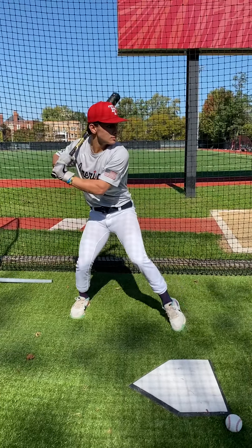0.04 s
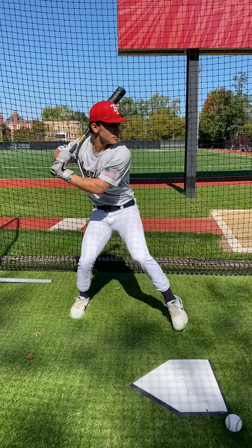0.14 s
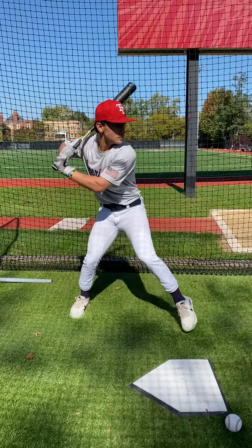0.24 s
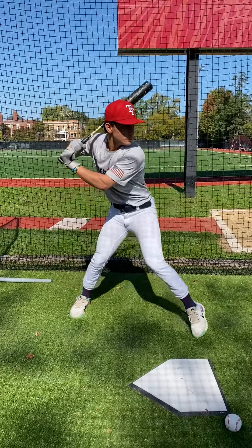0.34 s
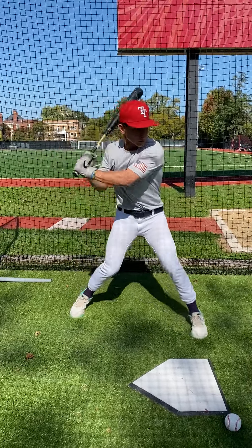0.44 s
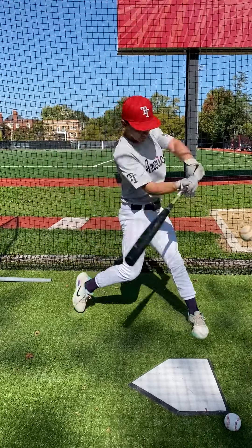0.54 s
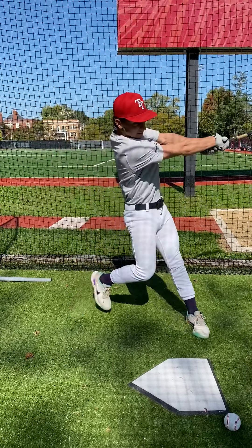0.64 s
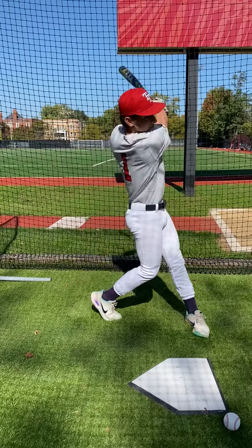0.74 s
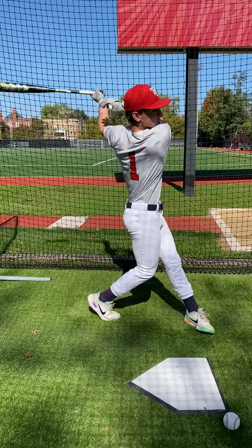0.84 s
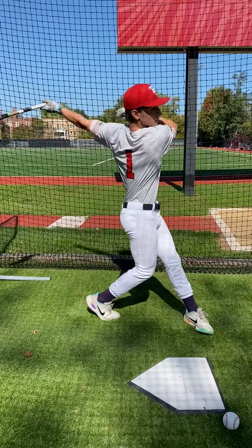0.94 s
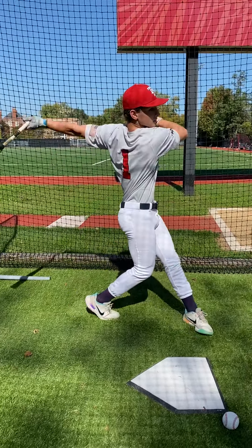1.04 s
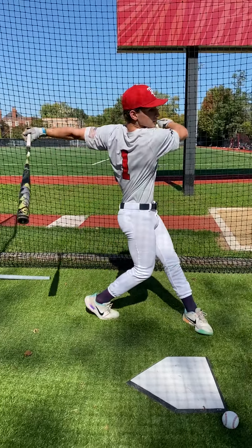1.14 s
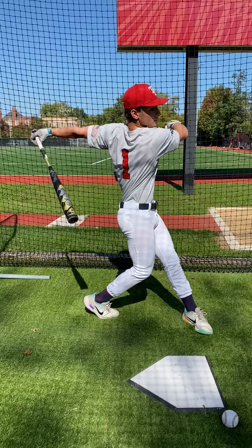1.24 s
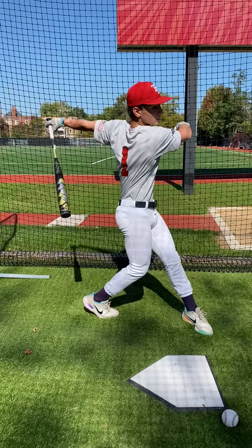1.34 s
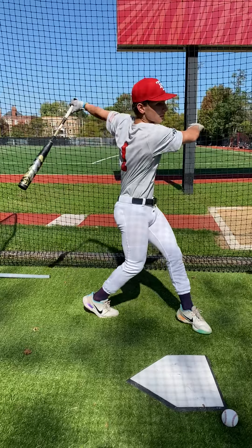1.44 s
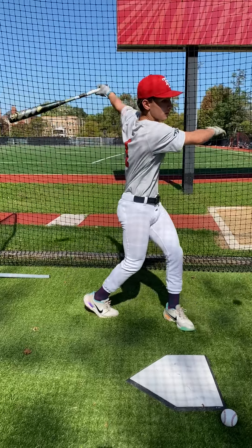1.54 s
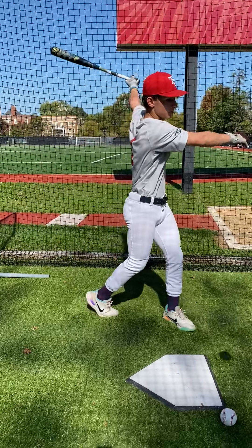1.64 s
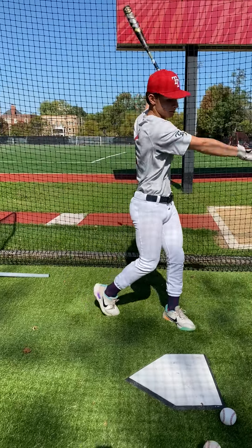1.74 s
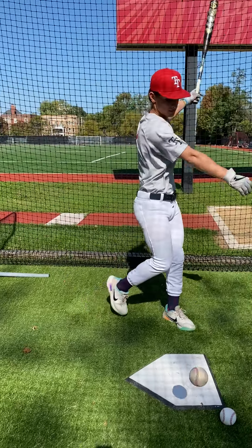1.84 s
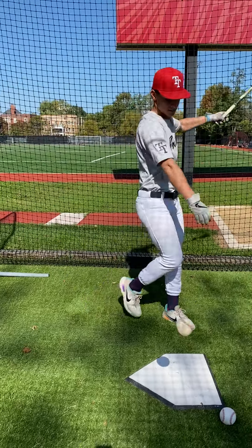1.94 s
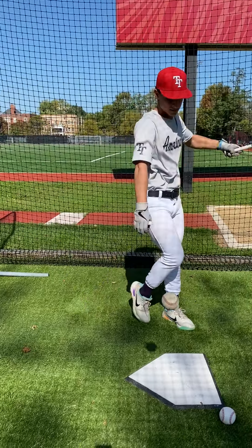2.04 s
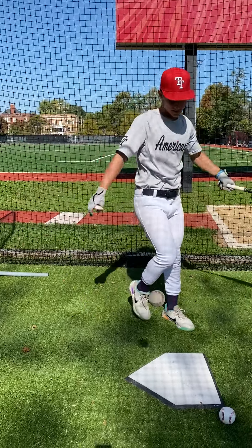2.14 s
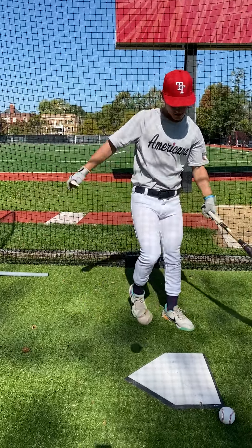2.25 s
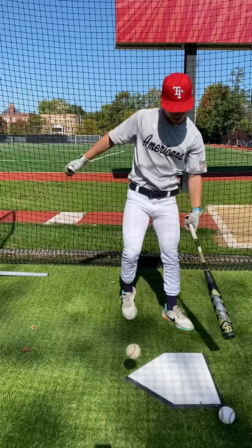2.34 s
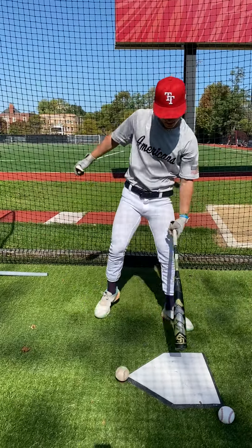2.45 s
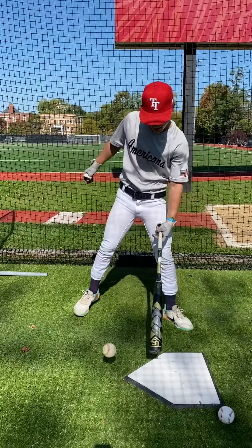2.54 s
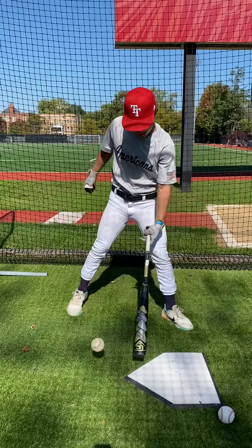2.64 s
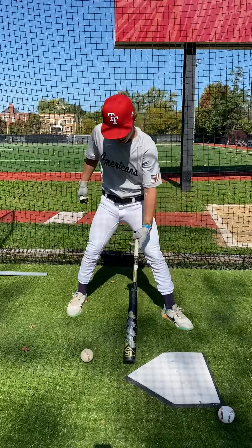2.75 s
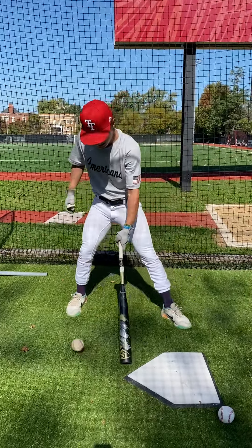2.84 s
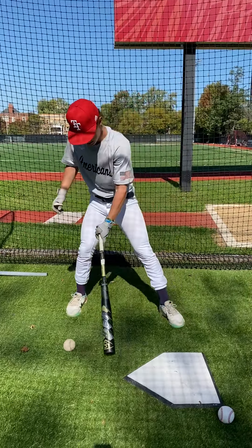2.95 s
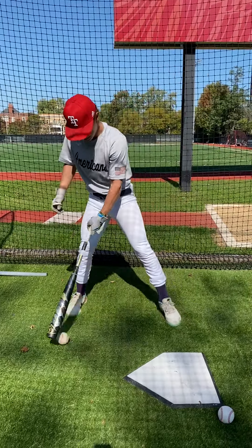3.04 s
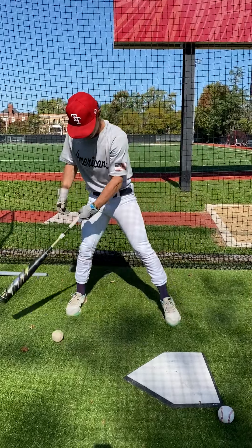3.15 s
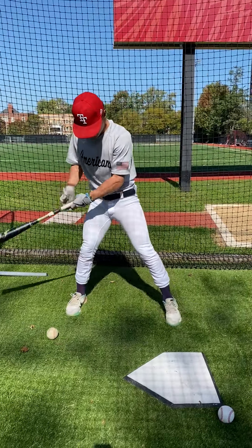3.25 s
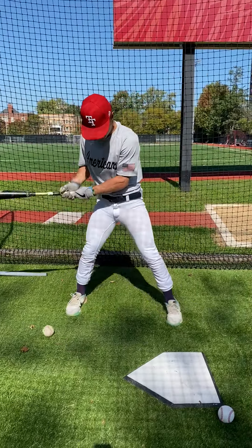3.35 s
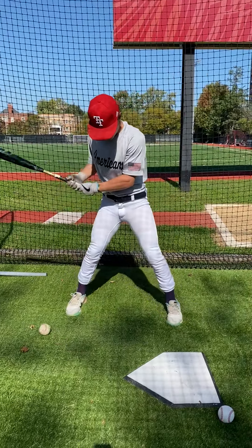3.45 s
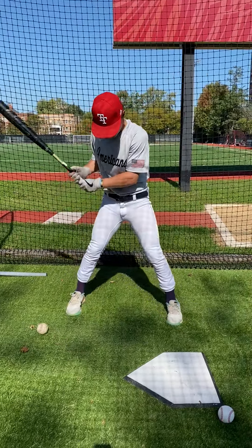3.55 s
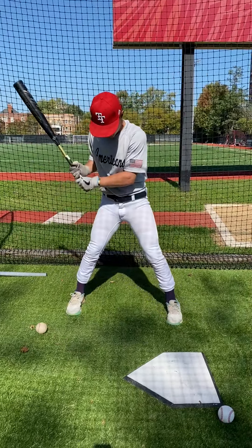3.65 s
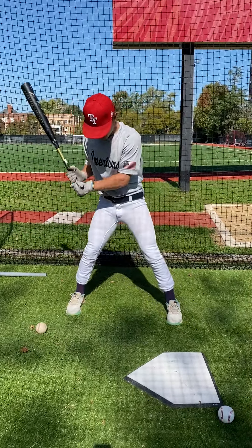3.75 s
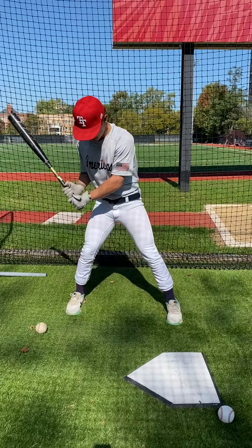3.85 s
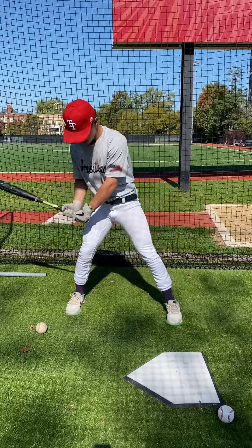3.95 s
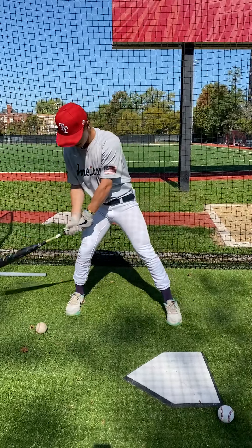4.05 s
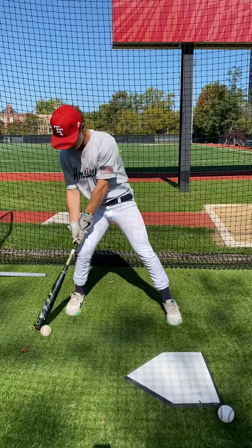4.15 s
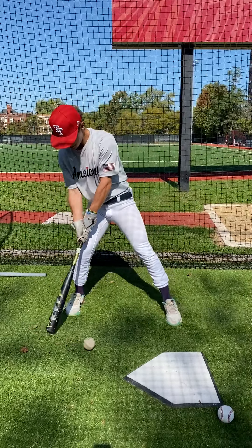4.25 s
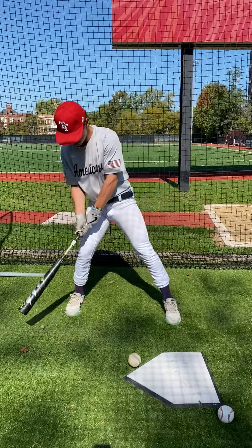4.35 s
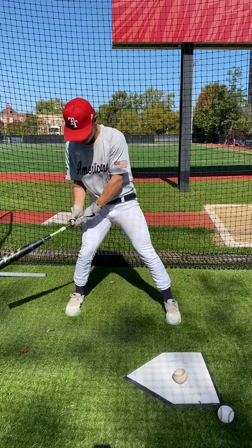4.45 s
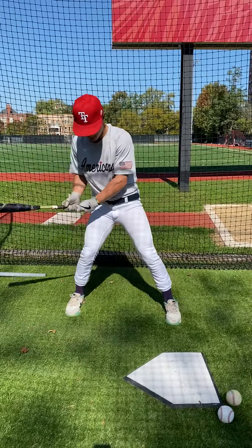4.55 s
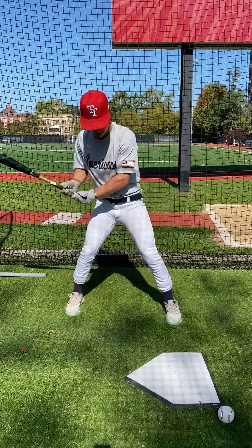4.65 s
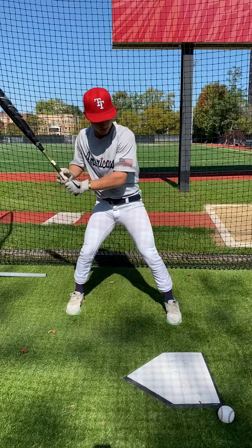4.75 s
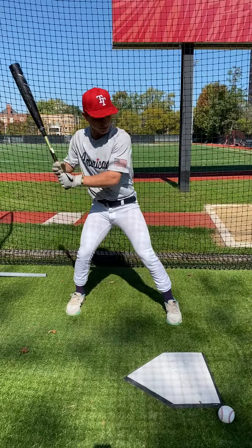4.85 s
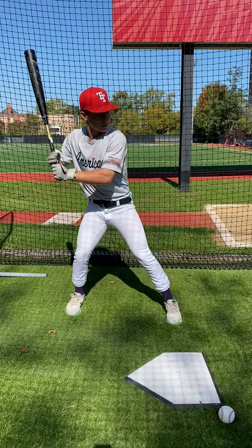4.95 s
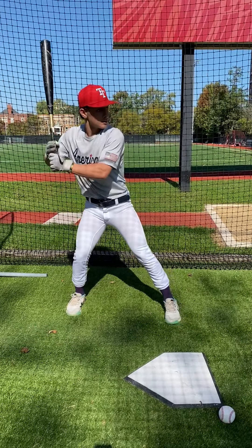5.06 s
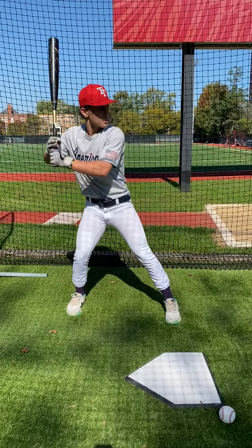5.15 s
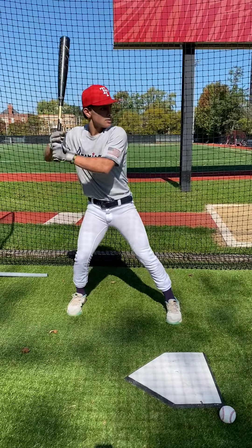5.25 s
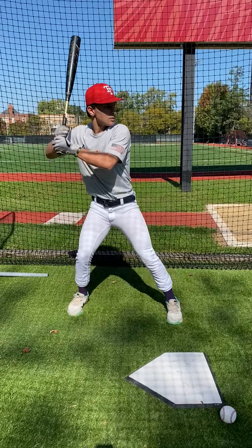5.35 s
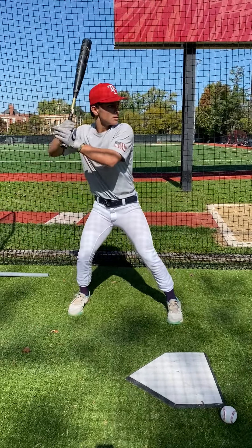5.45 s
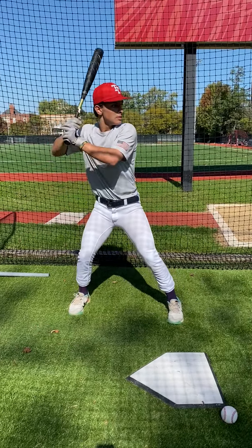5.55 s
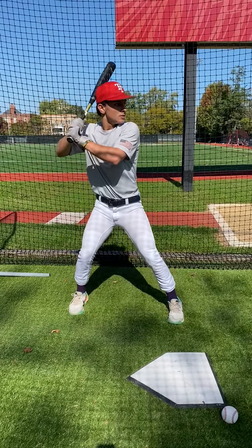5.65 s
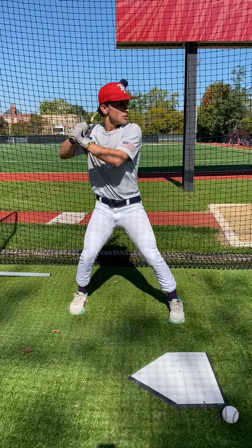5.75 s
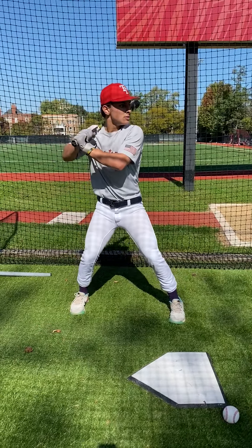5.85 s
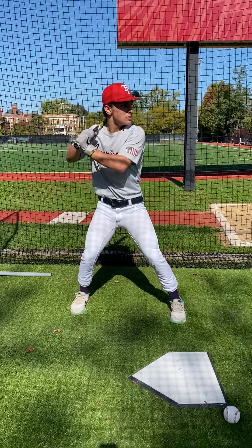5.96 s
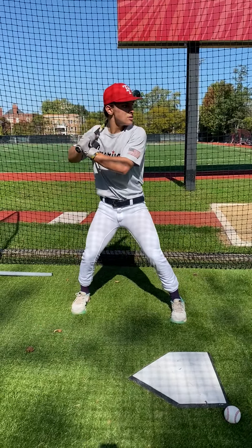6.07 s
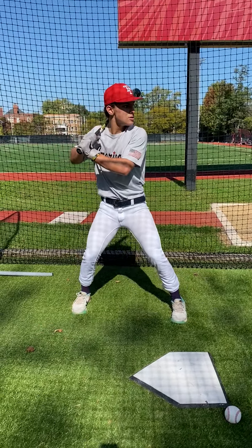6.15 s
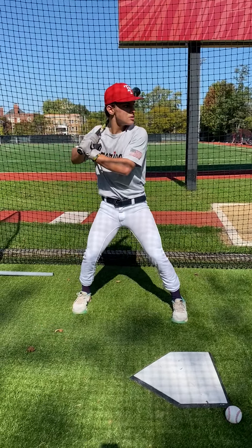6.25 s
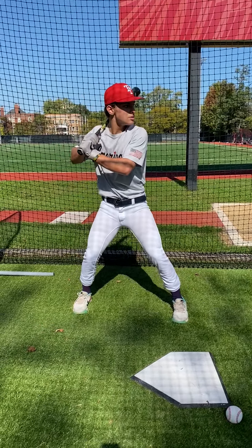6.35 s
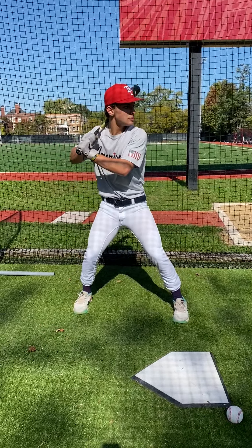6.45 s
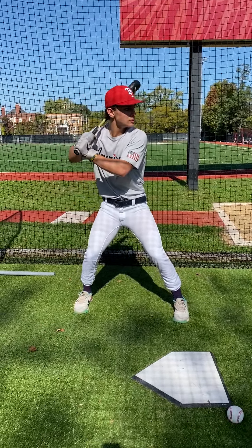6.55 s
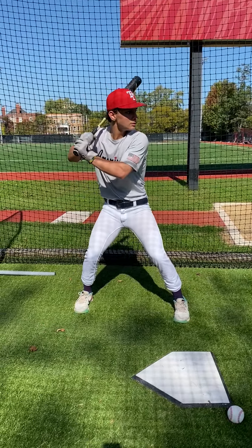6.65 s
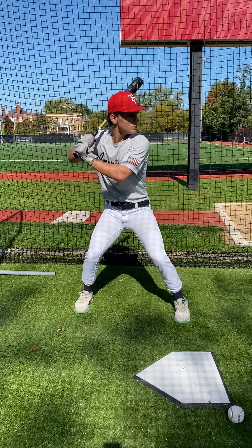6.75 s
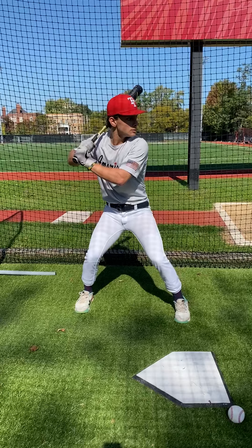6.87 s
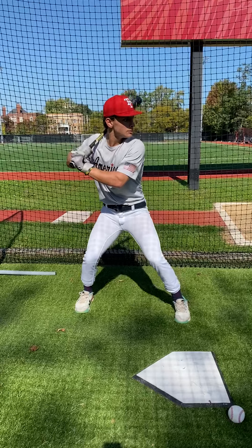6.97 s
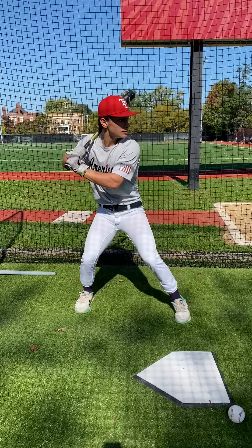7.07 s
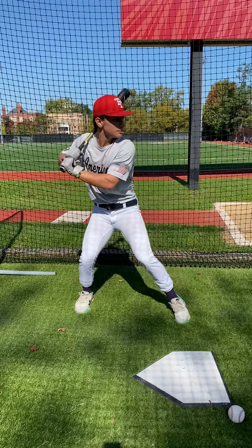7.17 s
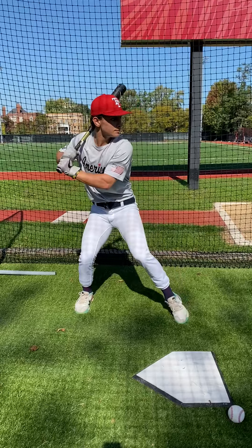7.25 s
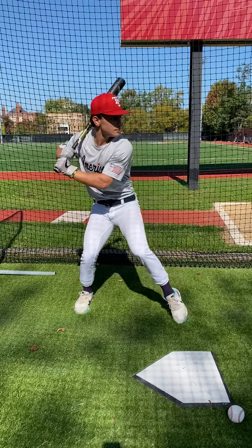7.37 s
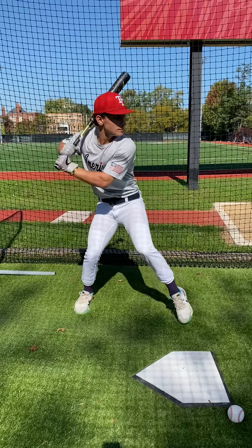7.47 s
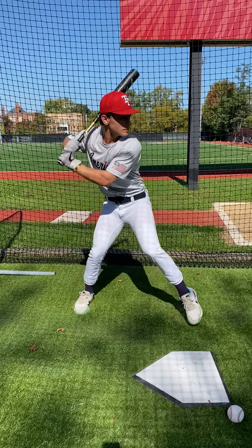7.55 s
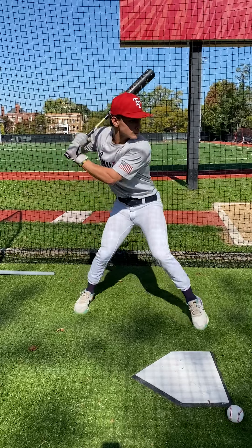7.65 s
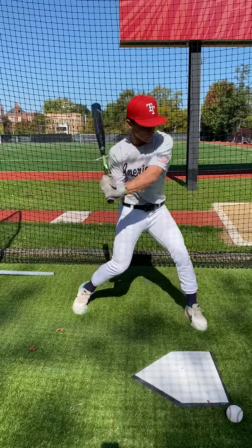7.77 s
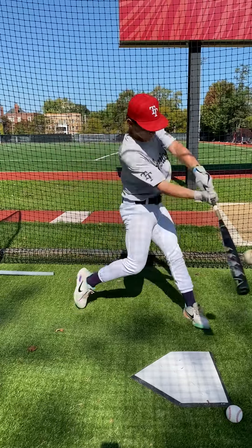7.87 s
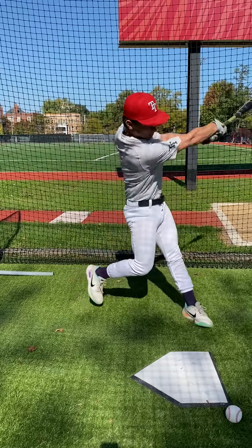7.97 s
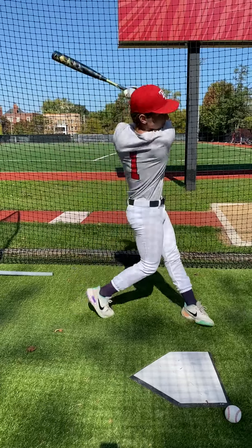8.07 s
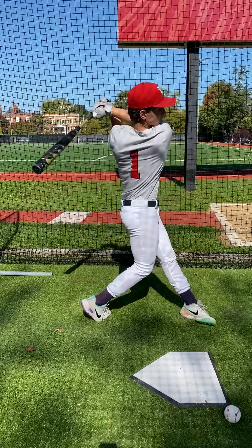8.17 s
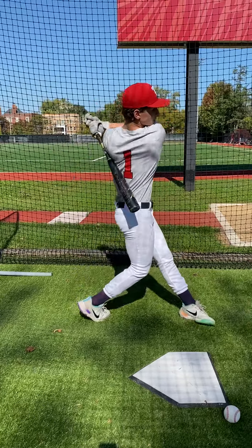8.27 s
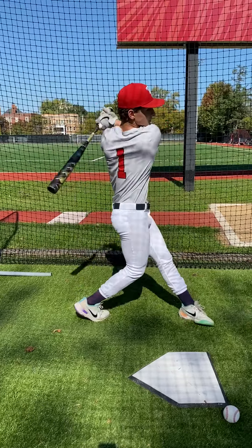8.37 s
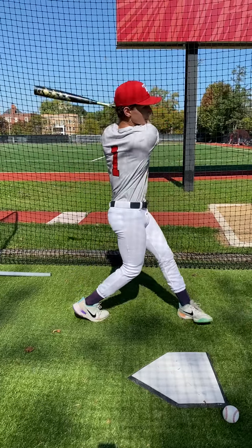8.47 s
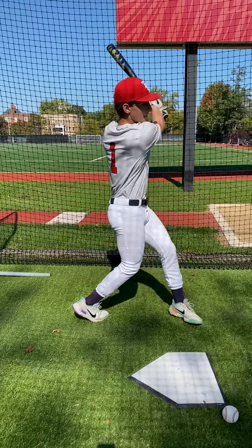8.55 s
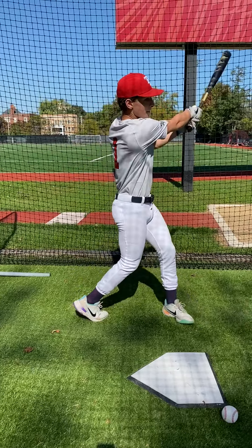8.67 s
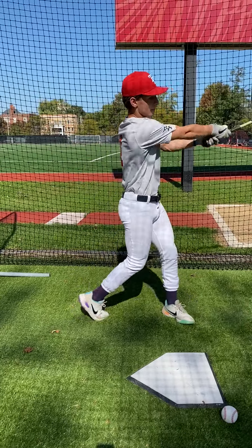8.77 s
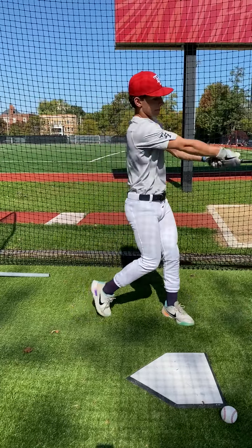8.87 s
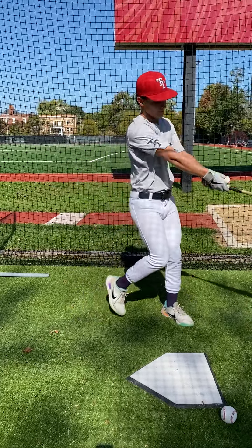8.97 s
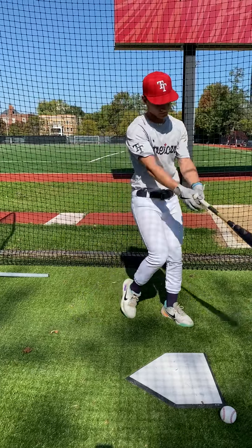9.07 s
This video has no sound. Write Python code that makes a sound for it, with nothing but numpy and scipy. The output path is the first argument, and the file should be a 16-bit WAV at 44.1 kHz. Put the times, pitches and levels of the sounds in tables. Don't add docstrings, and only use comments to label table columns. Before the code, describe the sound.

Outdoor batting cage: two sharp, ringing bat hits several seconds apart, with net rattle, far echo, turf thuds and low town hum.

```python
import sys
import numpy as np
from scipy import signal
from scipy.io import wavfile
from scipy.ndimage import uniform_filter1d

SR = 44100
rng = np.random.default_rng(int(sys.argv[2]) if len(sys.argv) > 2 else 0)


def log_audio(samples):
    frames = np.atleast_2d(samples).T
    limited = np.clip(frames, -1, 1)
    pcm = np.round(limited * 32767).astype(np.int16)
    wavfile.write(sys.argv[1], SR, pcm)


def magnitude_from_level(level_db):
    exponent = np.asarray(level_db, float) / 20
    return 10 ** exponent


N = 401751

# (time [s], crack level [dB], barrel level [dB], barrel pitch [Hz], air push level [dB])
BAT_HITS = [
    (0.6322, -11.5, -12.5, 3090, -16),
    (7.9388, -11.5, -15.5, 3043, -7.5),
]
# (time [s], level [dB])
TOWN_SWELLS = [(0.0, -35.5), (0.3, -37), (0.6, -38), (1.15, -43), (1.55, -40.5), (2.3, -41.5),
               (3.35, -42.5), (3.9, -41.5), (4.6, -41.5), (5.25, -41), (5.7, -40.5), (6.06, -37),
               (6.44, -37.5), (7.1, -37), (7.36, -37), (7.66, -36.5), (8.3, -37), (9.11, -38)]
# (frequency [Hz], gain [dB])
NEAR_COLOUR = [(20, -8), (40, 13.5), (7000, -4), (8500, -12.5), (10500, -21), (11500, -5), (15700, 2.5)]


def read(points, hz):
    f, value = np.transpose(points)
    return np.interp(np.log(hz + 1), np.log(f + 1), value)


def evened(x):
    return x / np.sqrt(np.mean(x ** 2) + 1e-20)


def wander(x, width):
    return evened(uniform_filter1d(uniform_filter1d(x, width), width))


def add(mix, s, sound):
    part = mix[:, round(s * SR):][:, :sound.shape[1]]
    part += sound[:, :part.shape[1]]


def colour(x, points):
    level_db = read(points, abs(np.fft.fftfreq(4096, 1 / SR)))
    log = np.log(magnitude_from_level(np.maximum(level_db, -90)))
    taps = np.fft.ifft(np.exp(log - 1j * signal.hilbert(log).imag)).real[:2048]
    return signal.oaconvolve(x, taps / np.linalg.norm(taps))[:len(x)]


def resonate(x, hz, width):
    turn = np.exp(2j * np.pi * hz * np.arange(len(x)) / SR)
    r = np.exp(-np.pi * width / SR)
    return 2 * (turn * signal.lfilter([1 - r], [1, -r], x / turn)).real


def rings(modes, t):
    u = np.maximum(t, 0)
    return sum(magnitude_from_level(db - 60 * u / t60) * np.sin(2 * np.pi * hz * u) for hz, db, t60 in modes)


def swell(t, rise, t60):
    return np.where(t < 0, np.exp(np.minimum(t, 0) / rise), magnitude_from_level(-60 * np.maximum(t, 0) / t60))


def humps(rows, t):
    return sum(magnitude_from_level(db) * np.exp(-2 * ((t - s) / half) ** 2) for s, half, db in rows)


def bat(s, crack_db, barrel_db, going_hz, push_db, ball, lead, snap_db, touch_s, song_s, touch, coming, left):
    # (frequency [Hz], density [dB per Hz])
    crack_mid = [(88, -24), (150, 0), (383, -5.5), (923, -2), (1690, -6.5), (2060, -10.5), (2700, -12),
                 (3100, -3), (3600, -7.5), (4300, -8), (5680, -23), (7320, -35.5), (10800, -50.5),
                 (14500, -36.5), (16000, -39)]
    # (frequency [Hz], density [dB per Hz])
    crack_wide = [(88, -23.5), (150, 0.5), (871, -3.5), (1870, -14.5), (2140, -18), (2810, -4.5),
                  (3490, -3), (3920, -13.5), (4860, -5), (6260, -17.5), (8730, -16.5), (11500, -16.5),
                  (16000, -29.5)]
    # (frequency [Hz], level [dB])
    snap_front = [(1500, -30.5), (4000, -8), (7000, -6.5), (8700, -8), (10200, -20), (11500, -7),
                  (16000, -8)]
    t = np.arange(-.04, .16, 1 / SR)
    noise, other = rng.standard_normal((2, len(t)))
    click = abs(t) < .5 / SR

    shape = 0.69 * swell(t, .003, 0.02) + 0.12 * swell(t, 0.0087, 0.15)
    shape += touch * swell(t + touch_s, 0.00033, 0.01)
    snaps = 1.2 * swell(t, .0002, .004)
    bright = signal.lfilter([1.3, -1.9, .7], [1], snaps * other - 9. * click) * 2.8

    hz = np.where(t < 0, coming * going_hz, going_hz)
    wobble = 1 + .6 * evened(uniform_filter1d(noise, 50))
    onset = np.clip((t + song_s) / (song_s / 2), 0, 1)
    sing = swell(t, 0.0083, 0.012) * onset * (0.57 + 0.36 * wobble)
    sing += 0.17 * swell(t - .004, 0.0021, .07) * wobble
    barrel = magnitude_from_level(barrel_db) * sing * np.sin(2 * np.pi * np.cumsum(hz) / SR)

    u = np.maximum(t - .0051, 0) / .0052
    push = magnitude_from_level(push_db) * 1.35 * np.exp(-.8 * u) * np.sin(np.pi * np.minimum(u ** .75, 2))
    ball_tones = 2 * rings(ball, t + lead) * (1 - np.exp(-np.maximum(t + lead, 0) / 0.0012))

    mid = magnitude_from_level(crack_db) * colour(noise * shape + bright, crack_mid) + barrel + ball_tones + push
    mid += magnitude_from_level(crack_db + snap_db) * colour(noise * swell(t, 0.00025, .006) + 3 * click, snap_front)
    side_shape = shape - .7 * touch * swell(t + touch_s, .0003, .01)
    side = magnitude_from_level(crack_db - 5.5) * colour(other * side_shape + bright, crack_wide)
    side += 0.26 * np.roll(barrel, 3)
    side += left * (ball_tones + 0.76 * (np.roll(push, -30) - np.roll(push, -130)))
    return s - .04, np.array([mid, side])


def squash(s, db, from_hz, to_hz, t60):
    t = np.arange(0, .05, 1 / SR)
    hz = to_hz + (from_hz - to_hz) * np.exp(-t / 0.0011)
    tone = magnitude_from_level(db - 60 * t / t60) * np.tanh(t / 0.00024) * np.sin(2 * np.pi * np.cumsum(hz) / SR)
    return s, np.array([tone, 0.4 * tone])


def net(s, slam_db, t60, frame_db, dark):
    # (frequency [Hz], density [dB per Hz])
    slam_mid = [(88, -42), (150, -17), (368, -17.5), (439, -24.5), (504, -7), (689, -11), (1080, -4.5),
                (3160, -8.5), (4160, -5), (7470, -16), (9260, -39), (11700, -17.5), (16000, -27)]
    # (frequency [Hz], density [dB per Hz])
    slam_wide = [(88, -68), (150, -33.5), (745, -21), (941, -8), (1100, -7.5), (1530, -8.5), (2360, -14.5),
                 (2760, -6.5), (3220, -13), (4950, 1.5), (6640, -12.5), (11900, -9), (16000, -33)]
    # (frequency [Hz], level [dB], t60 [s])
    clank_modes = [(2706, -0.5, .07), (1170, -7, .04), (4300, -9, 0.081), (4190, -5.5, 0.14),
                   (4090, -8, 0.22), (4010, -12, .06), (5490, -12.5, .04), (1845, -8, .075),
                   (2960, -10, 0.065), (3693, -16, 0.084), (4840, -12.5, .1)]
    t = np.arange(-.03, .8, 1 / SR)
    before = t < 0
    noise, other, chance = rng.standard_normal((3, len(t)))

    body = swell(t - np.clip(t, 0, .008), 0.0008, t60 * 0.45) * .8 + 0.22 * swell(t, .001, t60 * 1.7)
    shape = magnitude_from_level(1.5 * evened(uniform_filter1d(chance, 40))) * body
    late = 0.094 * swell(t - .01, 0.0045, 1.7 * t60)
    late *= signal.lfilter([.45], [1, -.6], chance)
    first_click = 6 * (abs(t - .0002) < .5 / SR)
    raw = [noise * shape + late - first_click, other * (shape + abs(late))]
    grains, loose = signal.lfilter([1], [1, -np.clip(dark, -.9, .9)], raw)
    creak = before * swell(t, 0.0061, t60) * np.diff(chance, prepend=0)
    grains += 0.74 * creak

    clank = rings(clank_modes[:2], t)
    clank += rings(clank_modes[2:], t) * np.tanh(abs(t / .009) ** 2) * 1.6
    taut = np.sin(2 * np.pi * clank_modes[0][0] * t)
    clank += .2 * before * swell(t, .006, t60) * taut
    clank *= 1 + .3 * evened(uniform_filter1d(other, 120))

    mid = magnitude_from_level(slam_db) * (colour(grains, slam_mid) + clank)
    side = magnitude_from_level(slam_db + 3) * (colour(loose + .2 * grains, slam_wide) + 1.2 * np.roll(clank, 6))
    return s - .03, np.array([mid, side])


def frame(s, frame_db, modes):
    t = np.arange(0, 1.5, 1 / SR)
    flutter, sway = (wander(v, 600) for v in rng.standard_normal((2, len(t))))
    shake = magnitude_from_level(1.8 * flutter)
    late = t + .000008 * sway + .0003 * (1 - np.exp(-t / .04))
    ring = magnitude_from_level(frame_db) * rings(modes, late) * shake
    opposed = magnitude_from_level(frame_db) * rings([(11500, -6.5, .5)], late) * shake
    return s + 0.0056, np.array([ring, .9 * np.roll(ring, 3) + opposed])


def thud(s, boom_db, boom_hz, knock_db, tick_db):
    # (frequency [Hz], level [dB])
    contact = [(300, 16.5), (1500, -2.5), (3000, -5), (4800, -6), (6000, -19), (8000, -12.5), (9500, -34.5),
               (12000, -19.5), (16000, -26)]
    ratio, sag = 3.5, .95
    t = np.arange(0, .14, 1 / SR)
    u = np.maximum((t - .0012) * boom_hz - .53, 0)
    v = np.maximum(t - .0012, 0) * boom_hz

    boom_phase = u + .5 * (1 - np.exp(-u / 0.18))
    boom = magnitude_from_level(boom_db - 6.5 * u) * (1 - np.exp(-u / 0.71)) * 2.13 * np.sin(2 * np.pi * boom_phase)
    boom += rings([(boom_hz * 0.61, boom_db - 2.5, .05)], t - .004) * np.tanh(u)

    knock_phase = ratio * sag * (1 - np.exp(-v / sag))
    knock = magnitude_from_level(knock_db - 14 * v ** 3) * np.sin(2 * np.pi * knock_phase)
    knock += rings([(ratio * boom_hz, knock_db - 15, .014)], t - .0012)
    knock *= np.tanh(v * 11)

    grit = swell(t - .0007, 0.00053, 0.006) + 0.15 * magnitude_from_level(-60 * t / 0.2)
    scuff = magnitude_from_level(tick_db) * colour(rng.standard_normal(len(t)) * grit, contact)
    side = 0.091 * boom + 0.24 * knock + 0.69 * np.roll(scuff, 4)
    return s, np.array([boom + knock + scuff, side])


def ping(s, db, hz, t60, left):
    t = np.arange(0, .06, 1 / SR)
    tone = rings([(hz, db, t60)], t) * np.tanh(t / .0008)
    return s, np.array([tone, left * np.roll(tone, 2)])


def tick(s, db, hz, t60, fizz_db):
    t = np.arange(-.004, .15, 1 / SR)
    puff = magnitude_from_level(db - 3.0) * swell(t, 0.0013, np.clip(t60, .005, .3))
    a, b = rng.standard_normal((2, len(t))) * puff
    shape = [(hz / 4, -24), (hz / 1.46, -6), (hz, 0), (hz + 1400, -9),
             (11000, fizz_db + 11.0), (16000, fizz_db - 8)]
    mid = colour(colour(a, shape), NEAR_COLOUR)
    return s - .004, np.array([mid, -.05 * mid + 0.85 * colour(b, shape)])


def rustle(s, length, db, hz, fizz_db):
    count = round(np.clip(length, .02, .4) * 1.6 * SR)
    a, b, c = rng.standard_normal((3, 30000))[:, :count]
    grains = magnitude_from_level(db + 2.9 * evened(uniform_filter1d(c, 120))) * np.hanning(count)
    shape = [(hz / 3, -22), (hz / 1.3, -4), (hz, 0), (hz * 1.3, -4), (hz * 1.7, -14),
             (12000, fizz_db), (16000, fizz_db - 2)]
    mid = colour(colour(a * grains, shape), NEAR_COLOUR)
    side = 1.8 * colour(signal.lfilter([.5], [1, -.5], b * grains), shape)
    return s - count / 2 / SR, np.array([mid, side])


def squeak(s, length, from_hz, to_hz, db):
    hz = np.linspace(from_hz, to_hz, round(length * SR))
    rough = 1 + .6 * wander(rng.standard_normal(len(hz)), 70)
    tone = magnitude_from_level(db) * rough * np.sin(2 * np.pi * np.cumsum(hz) / SR)
    tone *= signal.windows.tukey(len(hz), .5)
    return s, np.array([tone, .5 * tone])


def walls(x):
    # (delay [s], spread [s], level [dB])
    echoes = [
        (0.076, .02, -25),
        (0.226, 0.033, -23.5),
        (.275, 0.026, -33.5),
        (.36, 0.066, -26.5),
        (.5, .06, -42.5),
        (.65, 0.091, -36),
        (.95, 0.1, -47),
    ]
    t = np.arange(round(1.5 * SR)) / SR
    shape = sum(magnitude_from_level(db) * np.exp(-.5 * ((t - late) / wide) ** 2) / np.sqrt(wide * SR)
                for late, wide, db in echoes)
    shape *= magnitude_from_level(3.4 * evened(uniform_filter1d(rng.standard_normal(len(t)), 200)))
    blurred = 0.2 * x + 0.6 * abs(x) * rng.standard_normal(N)
    far = colour(blurred, [(100, -39.5), (500, -18.5), (1500, 0.5), (4000, 2.5), (7000, -10.5),
                           (8200, -33.5), (16000, -48.0)]) / 1.8
    return signal.fftconvolve(far[None], rng.standard_normal((2, len(t))) * shape, axes=1)[:, :N]


def net_shiver(t):
    since = [t - hit[0] for hit in BAT_HITS]
    return magnitude_from_level(-58) * sum(swell(u - np.clip(u, 0, 0.26), 0.055, 0.23) for u in since)


def hiss(t, noise, other):
    # (frequency [Hz], level [dB])
    cloth = [(2500, -37.5), (4000, -6.5), (5500, 8), (7500, 2), (10000, -23), (13000, 3.5), (16000, -16.5)]
    # (middle [s], half length [s], level [dB])
    fidgets = [
        (0.0, 0.23, -72),
        (1.9, 0.47, -77),
        (3.37, .06, -81),
        (3.6, 0.086, -83),
        (4.36, 0.41, -75),
        (5.08, 0.52, -74.5),
        (6.2, 0.93, -76),
        (7.36, 0.45, -74.5),
        (8.95, .5, -72),
    ]
    level = np.hypot(magnitude_from_level(-79.5) + net_shiver(t), humps(fidgets, t))
    dulling = [(7400, -0.5), (8000, -24.5), (12000, -22), (16000, -30.5)]
    mid = magnitude_from_level(-9.0) * level * colour(colour(noise, cloth), dulling)
    side = magnitude_from_level(-6) * level * colour(signal.lfilter([.4], [1, -.6], other), cloth)
    return np.array([mid, side])


def insects(t, noise):
    # (middle [s], half length [s], level [dB])
    chirrs = [
        (5.05, .5, -91),
        (6.04, 0.19, -76),
        (6.6, 0.48, -77),
    ]
    level = magnitude_from_level(-88.5) + magnitude_from_level(-17) * net_shiver(t) + humps(chirrs, t)
    return level * magnitude_from_level(-4.5) * evened(resonate(noise, 6700, 110))


def air(t, town_db, noise, other):
    # (frequency [Hz], density [dB per Hz])
    air_mid = [(240, -23), (400, 0), (465, -8.5), (520, -14), (636, -8.5), (1300, -14.5), (3370, -26.5),
               (3970, -25), (8000, -50), (10400, -79.5), (17600, -120)]
    # (frequency [Hz], density [dB per Hz])
    air_wide = [(18, -45), (30, -22), (118, -18), (157, -1), (204, -5.5), (394, -4), (569, -6.5),
                (988, -10), (1720, -21.5), (2290, -18.5), (4080, -28.5), (10200, -40.5), (13000, -57),
                (16000, -72)]
    whoosh = magnitude_from_level(-53) * sum(swell(t - hit[0], .09, 4.7) for hit in BAT_HITS)
    level = np.hypot(magnitude_from_level(-60.5 + 0.94 * (town_db + 42)), whoosh)
    return level * np.array([magnitude_from_level(2.5) * colour(noise, air_mid), magnitude_from_level(5.0) * colour(other, air_wide)])


def town_rumble(t, town_db, lumps, bass_gain, noise, fan_noise):
    # (frequency [Hz], density [dB per Hz])
    traffic = [(12, -43), (20, -31), (49, -4), (119, -4), (156, -1.5), (169, -1.5), (195, -11), (260, -10),
               (341, -14.5), (433, -22), (468, -27.5), (515, -23), (900, -41.5), (1170, -61), (1980, -120)]
    # (frequency [Hz], width [Hz], level [dB])
    fans = [(154.14, 11.7, -48.5), (290.2, 41, -59), (453, 57, -68.5)]
    puff = magnitude_from_level(-33.5) * sum(swell(t - hit[0], .045, .05) for hit in BAT_HITS)
    hum = sum(magnitude_from_level(db + 43.0) * evened(resonate(resonate(fan_noise, hz, width), hz, width))
              for hz, width, db in fans)
    low = (magnitude_from_level(town_db) + puff) * bass_gain * lumps * colour(noise, traffic)
    low += magnitude_from_level(town_db) * bass_gain * hum
    return np.array([low, .02 * low + .06 * np.roll(low, 40)])


def wind(t, noise):
    # (middle [s], half length [s], level [dB])
    gusts = [
        (3.95, 0.23, -45),
        (6.0, .06, -33),
        (6.36, 0.098, -31),
        (7.26, 0.06, -26.5),
        (8.15, 0.43, -31.5),
        (9.05, .06, -38),
    ]
    lowpass = signal.butter(3, 76.5, fs=SR, output="sos")
    return humps(gusts, t) * evened(signal.sosfilt(lowpass, noise))


def background(bass_gain):
    t = np.arange(N) / SR
    town_db = np.interp(t, *np.transpose(TOWN_SWELLS))
    a, b, c, d, e = rng.standard_normal((5, N))
    lumps = magnitude_from_level(1.4 * wander(e, 2000))
    around = town_rumble(t, town_db, lumps, bass_gain, a, e)
    around += air(t, town_db, b, d) + hiss(t, c, e)
    self_noise = resonate(resonate(c, 12300, 1200), 12300, 1200)
    around[0] += insects(t, b) + wind(t, d) + magnitude_from_level(-92.5) * lumps ** 3 * self_noise
    return around


def excess(x, over_db, db_per_s):
    power_db = 10 * np.log10(abs(uniform_filter1d(x ** 2, size=300)) + 1e-12)
    fall = np.arange(N) * db_per_s / SR
    held_db = np.maximum.accumulate(power_db + fall) - fall
    return uniform_filter1d(np.maximum(held_db - over_db, 0), size=200)


def scene():
    # (frequency [Hz], level [dB], t60 [s])
    balls = [
        [(800, -11, 0.017), (1150, -10.5, 0.022), (483.2, -13.5, 0.028), (1590, -20, 0.023), (287, -16, 0.023),
         (2270, -21, 0.0082)],
        [(896, -12, 0.026), (1400, -12.5, 0.025), (1590, -16, 0.027), (526, -11, 0.017), (174, -9, 0.022)],
    ]
    # (first touch before crack [s], song start before crack [s], touch strength [ratio],
    # approach pitch [ratio], left share of the ball [ratio])
    touches = [
        (0.0074, .024, 1, 1.07, .2),
        (.0080, 0.0069, 1.06, 1.12, 0.4),
    ]
    # (time [s], slam level [dB], t60 [s], frame level [dB], darkness [0-1])
    nets = [
        (0.7577, -16.5, 0.14, -38.5, 0.1),
        (8.064, -40, 0.48, -47.5, 0.34),
    ]
    # (frequency [Hz], level [dB], t60 [s])
    frames = [
        [(4027, 6, .95), (4037, -4, 1.5), (4070, 0, .2), (4156, -6, .15), (4274, -12, .5), (2960, -15, .49),
         (2700, -13, .46), (11300, -16.5, .55)],
        [(4004, -2, 1.7), (4026, -3, 1.5), (4075, -12, .3), (3359, -10, .5), (2805, -11, .6), (4468, -12, .35),
         (11300, -12, .7)],
    ]
    # (time [s], boom level [dB], boom pitch [Hz], knock level [dB], tick level [dB])
    thuds = [
        (1.8058, -7.5, 177, -10.5, -21.5),
        (2.4936, -25, 247, -63, -44),
        (4.2178, -33, 226, -22, -30),
        (8.694, -20, 190, -50, -34.5),
    ]
    # (time [s], level [dB], start pitch [Hz], end pitch [Hz], t60 [s])
    squashes = [
        (.6325, -17, 2600, 520, 0.017),
        (7.9391, -16, 1980, 635, 0.018),
        (0.6245, -20.5, 1800, 600, .014),
        (4.2183, -24.5, 1920, 690, 0.012),
        (4.2186, -28.5, 2350, 1550, 0.021),
        (8.3345, -34, 2400, 1000, 0.013),
        (5.9065, -48, 1530, 1400, 0.038),
        (5.906, -54, 5700, 5600, 0.026),
    ]
    # (time [s], level [dB], pitch
    # [Hz], t60 [s], fizz level [dB])
    ticks = [(0.1194, -39.5, 5790, 0.0073, -38), (1.2524, -51, 4000, 0.052, -22),
             (1.827, -51, 5000, 0.08, -19), (1.879, -40.5, 6040, 0.073, -13),
             (2.487, -47, 4270, 0.048, -24.5), (2.828, -56, 4410, 0.049, -26.5),
             (3.9417, -49.5, 3990, 0.026, -34), (4.5406, -57.5, 3940, 0.04, -22),
             (7.412, -37.5, 5240, 0.0093, -43), (7.862, -44, 3560, 0.062, -39),
             (8.007, -41, 3170, 0.23, -45), (8.335, -50, 3330, 0.08, -20), (8.8206, -55, 3340, 0.035, -27),
             (7.9903, -47, 7200, .008, -15), (8.293, -46, 5000, .01, -5), (8.3345, -39.5, 4000, .008, -20),
             (1.0, -47, 2880, .15, -47.5), (1.37, -54.5, 2950, .12, -60),
             (1.946, -55.5, 956, 0.034, -33),
        (5.906, -45, 1500, 0.054, -20.5),
        (7.887, -42, 1340, 0.18, -34),
        (7.9903, -38, 1700, 0.033, -44),
        (8.089, -27.5, 1780, 0.051, -28),
        (8.3345, -40, 1260, 0.043, -36),
        (1.03, -41, 1000, 0.11, -29),
    ]
    # (time [s], length [s], level [dB], pitch [Hz], fizz level
    # [dB])
    rustles = [(0.485, 0.2, -64.5, 5030, -14), (0.705, 0.051, -44.5, 3070, -57),
               (1.582, 0.11, -70, 5860, -8), (2.078, 0.042, -72, 5500, -11.5),
               (2.411, 0.097, -71.5, 5990, -7), (2.973, 0.25, -70, 5070, -13.5),
               (4.249, 0.083, -67, 5500, -14), (4.374, 0.05, -59.5, 4840, -19.5),
               (4.658, 0.047, -62, 4790, -20.5), (4.825, 0.1, -66.5, 5970, -17),
               (4.954, 0.06, -67, 5510, -17), (5.1, 0.11, -71.5, 6000, -19),
               (5.449, 0.21, -79.5, 5970, -11.5), (7.033, 0.033, -68, 6060, 2.5),
               (7.809, 0.19, -63, 5040, -12.5), (8.644, 0.16, -69, 5570, -2),
               (8.657, 0.069, -55, 1050, -38.5), (8.773, 0.1, -58.5, 2200, -35.5),
               (8.99, 0.046, -58, 3100, -42), (9.005, 0.36, -76, 6000, -10), (0.558, 0.14, -51, 1305, -29),
               (7.859, 0.15, -52.5, 1400, -40)]
    # (time [s], length [s], start pitch [Hz], end pitch [Hz], level [dB])
    squeaks = [
        (0.528, 0.035, 4260, 4470, -45.5),
        (8.614, 0.081, 1085, 1103, -57),
        (8.729, 0.023, 2160, 2110, -58),
        (8.789, .04, 1980, 2040, -68),
    ]
    # (time [s], level [dB], pitch [Hz], t60 [s],
    # left share [ratio])
    pings = [(0.611, -32, 3200, .015, .6), (.619, -30, 3800, .012, .7), (.6245, -22, 5160, 0.0088, .8),
             (.6315, -20.5, 2320, .008, 0.43), (.6285, -16.5, 3250, 0.009, .9),
             (.6445, -24, 3000, 0.022, .4), (.651, -28, 3300, .02, .6), (0.655, -30, 3350, .02, .7),
             (.684, -37, 1690, .025, .3), (.697, -38.5, 2800, .02, .3), (.7085, -34, 3340, 0.024, .3),
             (.7665, -18.5, 4270, 0.027, 0.66), (.81, -41, 1140, .05, .3), (.822, -37.5, 1127, 0.04, .3),
             (1.827, -42.5, 6330, .022, .5), (1.846, -52, 5920, .01, .5), (4.2172, -39, 4440, 0.013, .2),
             (4.2176, -46, 6980, .008, 0.62), (4.224, -45, 5240, .02, -.2), (4.228, -48, 4500, 0.016, -.2),
             (7.931, -22, 2606, .008, .1), (7.9345, -16, 810, 0.019, 1.5), (7.936, -18, 4300, .01, .5),
             (7.9415, -19, 380, 0.012, 1.3), (7.9346, -16, 3270, 0.0093, .8), (7.9428, -18, 3130, .014, .5),
             (7.943, -19, 1620, .014, .1), (7.9515, -28, 1300, 0.015, .3), (7.963, -27, 1500, .016, 0.33),
             (7.977, -34, 1300, .014, .2), (8.003, -30, 1600, .014, 0.059), (8.0085, -41, 4200, .012, .3),
             (8.018, -40, 2800, .015, .3), (8.036, -43, 3900, .015, .3), (8.073, -31, 1620, .02, .3),
             (8.229, -37, 1700, 0.026, 0.2), (8.696, -60, 4500, .02, .3)]
    # (time [s], level [dB], pitch [Hz], t60 [s], left
    taps = [(1.946, -50, 950, 0.018, .3), (2.494, -35, 440, 0.026, .3), (8.695, -34, 500, .025, .3),
            (4.2176, -42, 5600, .01, .4), (4.231, -52, 1500, .03, .3), (7.991, -36, 1730, .018, .2),
            (3.9424, -54, 4000, 0.013, .3), (5.9065, -52, 2100, .02, .3), (7.887, -34, 1300, .02, .3),
            (8.18, -37, 1800, .02, .3), (8.2, -43, 3700, .03, .3), (8.132, -43, 1500, .02, .3),
            (.985, -43, 2900, .05, .3), (1.019, -40, 2900, .05, .3), (1.385, -51, 2950, .05, .3)]
    squash_lead_s = (0.000067, 0.0032)
    snap_level_db = (-20, -14.5)

    loud, small, ring = np.zeros((3, 2, N))
    for row, ball, lead, snap_db, touch in zip(BAT_HITS, balls, squash_lead_s, snap_level_db, touches):
        add(loud, *bat(*row, ball, lead, snap_db, *touch))
    for row in nets:
        add(loud, *net(*row))
    for row, modes in zip(nets, frames):
        add(ring, *frame(row[0], row[3], modes))
    for source, rows in [(thud, thuds), (squash, squashes), (tick, ticks), (rustle, rustles),
                         (squeak, squeaks), (ping, pings + taps)]:
        for row in rows:
            add(small, *source(*row))

    bass_gain = magnitude_from_level(-.6 * excess(loud[0], -25.5, 38.5))
    around = ring + background(bass_gain)
    heard = loud[0] + .5 * small[0]
    duck = magnitude_from_level(-0.87 * excess(heard, -27, 58.5))
    mid, side = loud + small + (around + walls(loud[0])) * duck + .5 * ring * (1 - duck)
    return np.array([mid + side, mid - side])


def low_pass(x):
    return signal.sosfilt(signal.butter(12, 16970, fs=SR, output="sos"), x)


def record(dry):
    limited = .97 * np.tanh(dry / .97)
    limited *= np.minimum(np.arange(N, 0, -1) / 90, 1)
    limited = signal.lfilter(*signal.butter(1, 22, "high", fs=SR), limited)
    edge = signal.firwin(511, 15900, window=("kaiser", 9), fs=SR)[None]
    return low_pass(signal.oaconvolve(limited, edge, "same"))


dry = scene()
out = record(dry)
log_audio(out)
```